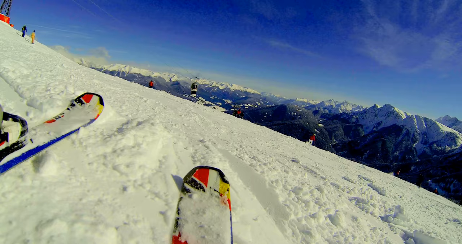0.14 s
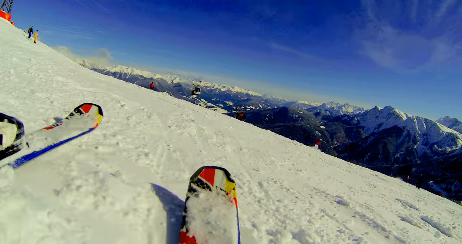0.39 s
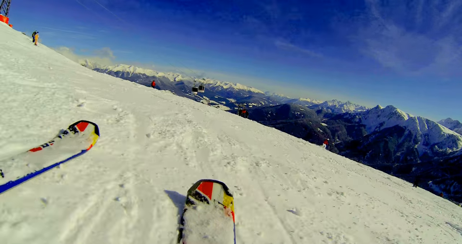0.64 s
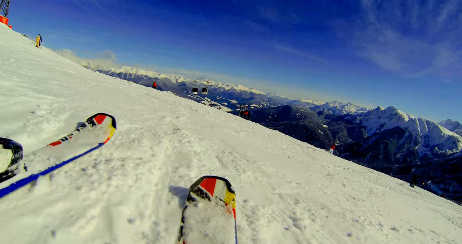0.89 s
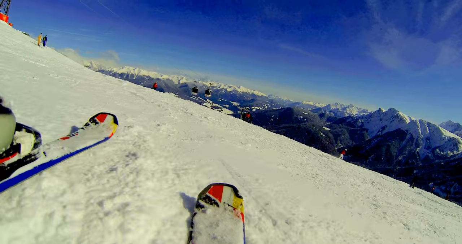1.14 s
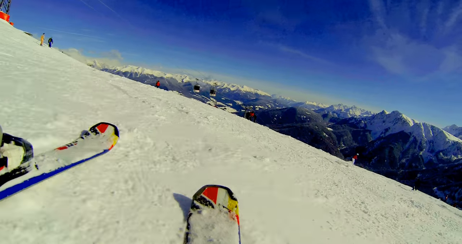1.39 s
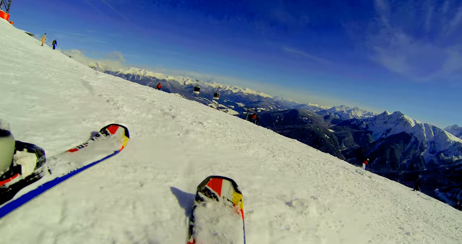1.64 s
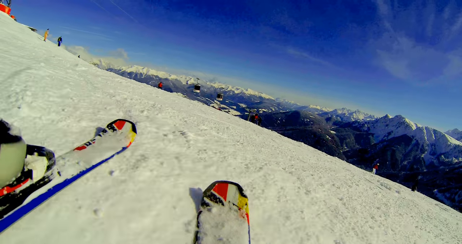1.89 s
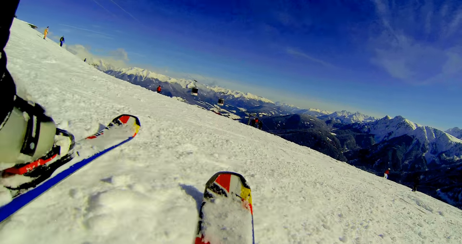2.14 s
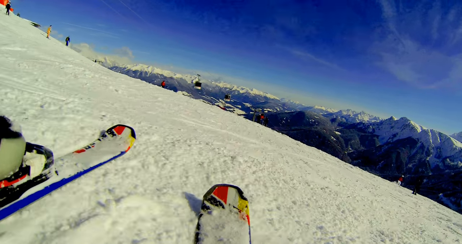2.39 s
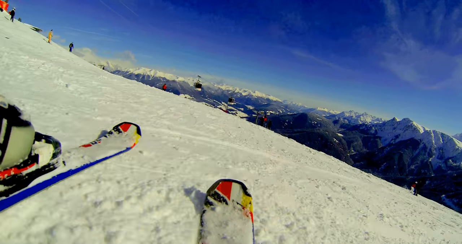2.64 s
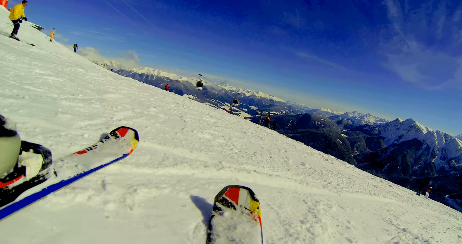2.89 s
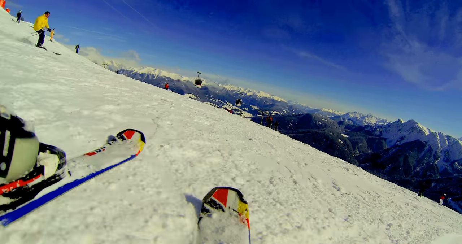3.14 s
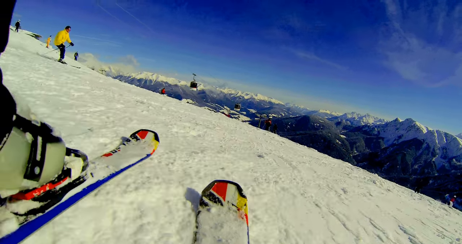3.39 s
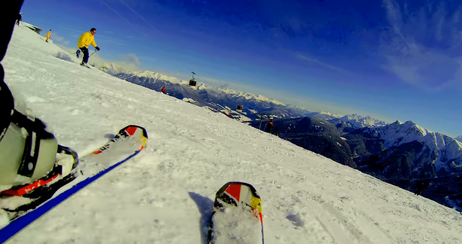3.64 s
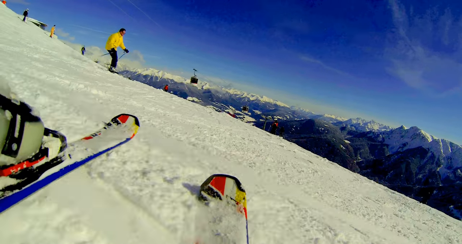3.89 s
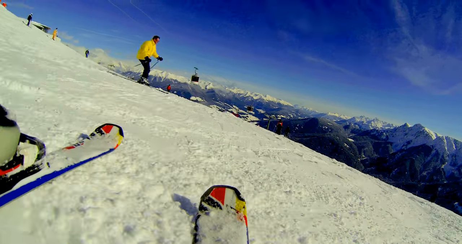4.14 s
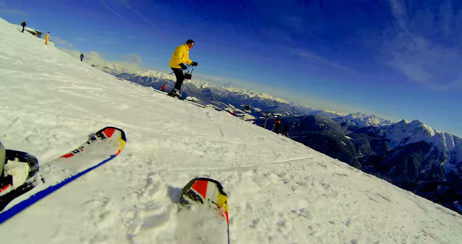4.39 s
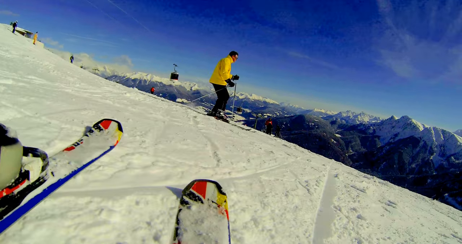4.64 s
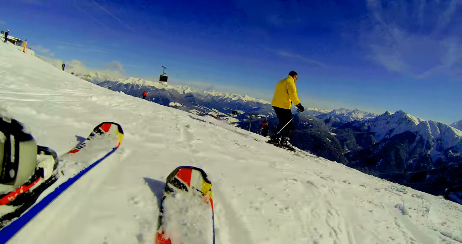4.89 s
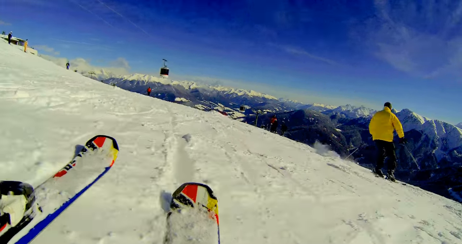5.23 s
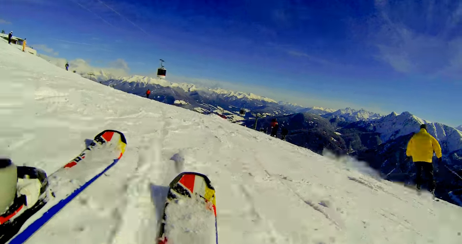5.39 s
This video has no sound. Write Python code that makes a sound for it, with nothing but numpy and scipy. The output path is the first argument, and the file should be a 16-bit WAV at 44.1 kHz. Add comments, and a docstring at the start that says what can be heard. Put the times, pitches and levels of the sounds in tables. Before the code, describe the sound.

Turbulent wind strikes a plastic case carried low beside fast-moving skis: low, lumpy buffeting with gritty edges, thudding slaps and very short lulls. Underneath lies a faint, grainy hiss of skis on hard snow, slightly stronger around 3.6 and after 5 seconds. Bumps shake the case with a deep throb, and its loose joint gives dry plastic knocks: a few from 0.07 to 0.5, a heavy cluster at 0.7-0.8, more at 1.0-1.1, rattling runs at 1.4 and 1.7-1.9, and a tight burst at 2.15. From 2.4 to 4.0 wind leads, with gusts crowding and only scattered knocks, such as 2.95 and 3.4. Brief hollow hoots glide in the wind near 1.2, 3.0, 3.75, 4.3 and 5.2. Knocks return at 4.03-4.3 and 5.0-5.1, then gusts ease into steady wind and sliding. Everything is close, dry and outdoors, with the loudest peaks slightly rounded.

```python
"""Skis over hard snow

The ski bases hiss as crystals shear beneath them.
Turbulent air buffets a plastic case carried low beside the skis, with sharp, gritty gust fronts and slaps
of single eddies; now and then vortices shed in step, a gliding hoot. Bumps swing the case on its springy
mount, whose loose joint knocks at the ends of the swing and frets in tiny ticks."""
import sys
import numpy as np
from scipy import signal
from scipy.fft import rfft, irfft
from scipy.io import wavfile
from scipy.ndimage import uniform_filter1d

SR = 44100
rng = np.random.default_rng(int(sys.argv[2]) if len(sys.argv) > 2 else 0)


def inscribe(sig):
    """Save sig as 16-bit PCM at rate SR to the path in sys.argv[1].

    A 1-D sig is mono; a 2-D sig holds one channel per row.
    Samples are clipped to [-1, 1] before scaling.
    """
    pcm = np.round(np.clip(np.atleast_2d(sig).T, -1, 1) * 32767)
    wavfile.write(sys.argv[1], SR, pcm.astype(np.int16))


N = 244314
TIME = np.arange(N) / SR  # s

# Levels in the tables are relative; each layer adds its own offset.
# gusts on the case: start_s, length_s, large_eddies_db, small_eddies_db
GUST_EVENTS = [(0.275, 0.066, -12.5, -28.5), (0.417, 0.092, -14.5, -25.5), (0.507, 0.038, -14.5, -32),
               (0.678, 0.046, -20, -38), (0.766, 0.038, -16, -28.5), (0.856, 0.04, -17, -26),
               (1.066, 0.06, -16.5, -41), (1.193, 0.14, -14, -27), (1.389, 0.126, -16.5, -36),
               (1.535, 0.049, -18, -26.5), (1.572, 0.044, -17.5, -39), (1.712, 0.032, -15, -31),
               (1.854, 0.061, -16.5, -37), (2.211, 0.063, -16, -38), (2.389, 0.072, -11, -30.5),
               (2.487, 0.048, -13.5, -28), (2.664, 0.034, -14, -29), (2.714, 0.068, -15, -28),
               (2.806, 0.079, -12.5, -29), (2.887, 0.061, -15, -23.5), (2.959, 0.16, -14, -21),
               (3.137, 0.076, -16.5, -36), (3.245, 0.082, -12.5, -31), (3.334, 0.068, -18, -33),
               (3.404, 0.03, -12.5, -31), (3.597, 0.12, -16, -21.5), (3.734, 0.14, -11, -26),
               (3.891, 0.066, -15.5, -36), (4.11, 0.11, -15.5, -28), (4.268, 0.083, -13, -26.5),
               (4.655, 0.042, -10.5, -20), (5.047, 0.116, -13, -25.5), (5.188, 0.048, -15.5, -33),
               (5.25, 0.067, -15.5, -29.5)]
# steady wind noise between gusts, breakpoints: time_s, level_db
STREAM_LEVEL = [(0.0, -18), (0.1, -29), (0.4, -20), (1.0, -27.5), (1.35, -20.5), (1.68, -28), (1.75, -20.5),
                (2.15, -23), (2.3, -25), (2.6, -23.5), (3.0, -25), (3.5, -19.5), (4.05, -21), (4.5, -22),
                (4.85, -27.5), (5.05, -17.5), (5.25, -31.5), (5.54, -21.5)]
# brief dips in the level of the steady wind noise (negative ones are lifts): start_s, length_s, dip_db
STREAM_DIPS = [(0.18, 0.075, -2), (0.555, 0.07, 4.5), (0.921, 0.041, 0), (1.939, 0.12, 12),
               (2.273, 0.013, 1), (3.57, 0.015, 7), (3.881, 0.012, 4), (3.959, 0.015, 20),
               (4.225, 0.038, 2.5), (4.369, 0.099, 8), (4.73, 0.061, 10), (4.88, 0.037, 4.5),
               (5.33, 0.05, -1.5)]
# vortices shed in step: start_s, length_s, first_hz, middle_hz, last_hz, level_db, swell_db (first to last)
VORTEX_HOOTS = [(1.07, 0.078, 246, 261, 272, -24.5, -18), (1.174, 0.15, 227.7, 244.6, 385, -14.5, 5),
                (1.42, 0.089, 203, 208.6, 210, -19.5, 3), (1.885, 0.047, 254, 322, 340, -21.5, 3),
                (2.81, 0.051, 309, 307, 330, -16, 8), (3.012, 0.0904, 211.6, 255, 313, -14, 6),
                (3.098, 0.1, 371.5, 365, 248, -20.5, 7), (3.61, 0.11, 198, 220.6, 275, -18.5, 14),
                (3.746, 0.1, 219, 252, 211, -11, -5.5), (3.905, 0.04, 194, 201, 187, -12.5, 3),
                (4.134, 0.08, 240, 277.6, 322, -16.5, 10.5), (4.29, 0.045, 190, 200, 200, -14, -4),
                (5.193, 0.1152, 348.6, 280.2, 264.3, -17.5, 9.5)]
# strongest single eddies on the case: time_s, peak_db, centre_hz
EDDY_SLAPS = [(0.253, -1, 252), (0.306, 0.5, 263), (0.446, -0.5, 248), (0.527, 2, 280), (0.689, -1, 312),
              (0.793, -4, 423), (1.276, 1.5, 270), (1.396, 0.5, 295), (2.219, -1, 255), (2.681, -2, 217),
              (2.815, 1, 280), (2.849, -1, 303.5), (2.968, -0.5, 283.6), (2.995, -6, 280),
              (3.283, -1.5, 265), (3.362, -3, 243), (3.911, 0, 332), (4.116, -4, 290), (4.661, -5.5, 258.2),
              (5.079, -0.5, 278.5), (5.107, -0.5, 260)]
# sharp gust fronts, abrupt puffs of small eddies: time_s, peak_db
GUST_FRONTS = [(0.253, -21), (0.652, -13.5), (0.686, -12), (1.395, -15.5), (1.708, -10.5), (2.075, -17.5),
               (2.397, -17.5), (2.512, -13), (2.618, -16.5), (3.248, -23), (3.909, -18), (3.983, -17),
               (4.384, -26), (4.481, -26), (4.922, -17.5), (5.446, -15.5)]
# spectrum of the gust fronts: frequency_hz, density_db (per Hz)
FRONT_COLOUR = [(200, -7.5), (450, 5.5), (750, 0.5), (1100, -12), (1330, -10.5), (1700, -15), (3000, -19.5),
                (4500, -37.5), (15000, -53)]
# spectrum of the large eddies: frequency_hz, density_db (per Hz)
BIG_EDDY_COLOUR = [(40, -16), (90, -3), (130, -6), (230, 1.5), (330, -5), (450, -11), (650, -23),
                   (1000, -39), (2000, -70.5), (5000, -100)]
# spectrum of the small eddies: frequency_hz, density_db (per Hz)
SMALL_EDDY_COLOUR = [(150, -9), (350, 8.5), (500, 4.5), (750, -2.5), (900, -13), (1100, -11.5), (1330, -25),
                     (1600, -15), (2000, -25.5), (3000, -40), (5000, -51), (15000, -58.5)]
# rough snow shakes the mount: start_s, length_s, swing_db, light_rattle_db
SNOW_BUMPS = [(0.03, 0.21, -20, -47), (0.234, 0.099, -18, -58), (0.383, 0.032, -17, -28),
              (0.46, 0.031, -15.5, -28.5), (0.68, 0.055, -13, -39), (0.744, 0.07, -16.5, -15.5),
              (0.988, 0.085, -22, -61), (1.351, 0.066, -16.5, -37), (1.554, 0.06, -19, -39),
              (1.705, 0.21, -17, -27.5), (2.128, 0.064, -15, -17.5), (2.208, 0.41, -25.5, -61),
              (2.624, 0.14, -16, -42.5), (2.81, 0.22, -18, -44), (3.29, 0.067, -15, -50),
              (3.385, 0.077, -15, -35.5), (3.57, 0.018, -15, -28), (3.631, 0.19, -22.5, -63),
              (3.86, 0.16, -18.5, -53), (4.023, 0.1, -14.5, -25.5), (4.283, 0.05, -18.5, -19),
              (4.547, 0.16, -21, -44), (4.953, 0.16, -16.5, -39.5), (5.456, 0.16, -16, -54)]
# spectrum of the jolts to the mount: frequency_hz, density_db (per Hz)
MOUNT_COLOUR = [(15, -30), (30, -24), (42, -20), (55, -2.5), (68, -4), (85, -3.5), (110, -13.5), (160, -13),
                (400, -82), (1500, -140)]
# the loose joint hits its stop hard: time_s, level_db, hardness_db (of the crack)
HARD_KNOCKS = [(0.0674, -22.5, -1), (0.0861, -21, -2), (0.1229, -25, -11), (0.1572, -25.5, -7),
               (0.3018, -19, 1.5), (0.3924, -18.5, -0.5), (0.4795, -16.5, 0), (0.536, -28, -6),
               (0.6953, -15.5, -2), (0.7414, -15.5, -3.5), (0.7528, -13.5, -11), (0.7599, -16.5, -5),
               (0.7704, -10.5, -7.5), (0.7889, -10.5, -11), (0.8066, -9, -23), (0.8652, -26, -4.5),
               (0.8895, -28.5, -4), (1.011, -21, -0.5), (1.031, -24, 0), (1.0931, -20, -1),
               (1.3457, -28, -4), (1.3713, -28, -7), (1.398, -17.5, -8), (1.406, -15.5, 1.5),
               (1.4219, -18, -10), (1.4261, -19, -2), (1.4469, -25.5, -2), (1.5642, -17.5, -2),
               (1.5838, -18.5, -1.5), (1.74, -15.5, 0), (1.7618, -19.5, 2.5), (1.791, -16.5, 1),
               (1.8031, -12.5, -9), (1.816, -18, -1), (1.8383, -19, -2), (1.8492, -22.5, -2),
               (1.867, -21, -3), (1.8772, -15, -7), (1.881, -16, -8), (1.9057, -23, -3),
               (2.1366, -19.5, -1.5), (2.1524, -19.5, 0), (2.162, -14.5, -6), (2.166, -18, -15),
               (2.169, -17.5, -5), (2.181, -15.5, -3), (2.184, -16.5, -23), (2.189, -17.5, -4),
               (2.204, -24, 0), (2.2612, -31.5, -14), (2.7283, -30.5, -3), (2.953, -14.5, -0.5),
               (2.9638, -27, -4), (3.3184, -25.5, -7), (3.3886, -15, 0), (3.4235, -15, -1),
               (3.4406, -25, -1), (3.598, -24, -1), (4.033, -14, -0.5), (4.048, -15, -11),
               (4.0521, -16.5, -2), (4.0623, -13.5, -6), (4.0849, -24, -2), (4.1238, -23, -2),
               (4.279, -24, -8), (4.2914, -21.5, -2), (4.3067, -17, -4.5), (4.324, -22.5, -2),
               (4.388, -30, -11), (4.5612, -28, -5), (4.6171, -23.5, -3.5), (4.6658, -21, -8),
               (4.9845, -13, -0.5), (5.0382, -13, -3), (5.063, -17.5, -1), (5.091, -22, -4),
               (5.1164, -24.5, -6.5)]
# spectrum of a blow on the case: frequency_hz, density_db (per Hz)
CASE_COLOUR = [(200, 2), (700, 0), (1150, -8), (1600, -4), (1950, 1.5), (2900, 1.5), (3600, -10.5),
               (4300, -13), (5300, -9.5), (6700, -27), (8500, -19.5), (10000, -26), (12000, -31.5),
               (15000, -33)]
# the bases slide on the snow, breakpoints: time_s, level_db
SLIDE_LEVEL = [(0.0, -47), (0.49, -47), (0.63, -44.5), (0.95, -50), (1.45, -44.5), (1.93, -43.5),
               (2.24, -51), (2.6, -50), (2.82, -45.5), (3.1, -46.5), (3.33, -46.5), (3.55, -40),
               (4.18, -48.5), (4.91, -45.5), (5.11, -41.5), (5.54, -43)]
# spectrum of sheared snow: frequency_hz, density_db (per Hz)
SNOW_COLOUR = [(100, -8.5), (600, 6), (1250, -1.5), (1700, 1), (2400, -2), (3200, -1), (4200, -10),
               (5300, -19), (6700, -22), (8400, -22), (9800, -34.5), (12000, -27.5), (15000, -40.5)]
# faint resonances of the plastic shell: centre_hz, width_hz, lift_db
SHELL_BANDS = [(712, 67, 4.5), (892, 42, 8.5), (1170, 130, 4.5), (1570, 190, 4)]

GUST_RISE_S, GUST_FALL_S, DIP_EDGE_S, FRONT_RISE_S = 0.005, 0.0038, 0.0077, 0.0015
BUMP_RISE_S, BUMP_FALL_S = 0.014, 0.029
CRUISE_SWING_DB = -29  # the swing never quite rests
SPRING_HZ = 57  # nominal swing rate of the mount, about which it wanders
REST_S = 0.005  # a hard blow leaves no room for a light one this close to it
EDGE_HZ = 15400  # upper band limit


def gain_of(db):
    """Logarithmic level: decibels to amplitude."""
    return 10 ** (np.asarray(db) / 20)


def curve(rows, at=TIME):
    """Linear interpolation: each column of a table joined by straight lines in time."""
    s, *columns = np.transpose(rows)
    return [np.interp(at, s, c) for c in columns]


def read(points, hz):
    """Spectral interpolation: a level in dB, linear along a log-frequency axis."""
    f, db = np.transpose(points)
    return np.interp(np.log(hz + 1), np.log(f), db)


def coloured(x, points):
    """Linear filtering: a spectrum imposed on x, then scaling to unit standard deviation."""
    hz = np.fft.rfftfreq(N, 1 / SR)
    y = irfft(rfft(x) * gain_of(read(points, hz)), N)
    return y / y.std()


def strength(x, size):
    """Short-time power: the running rms of a sound over about size samples."""
    power = uniform_filter1d(uniform_filter1d(x ** 2, size), size)
    return np.sqrt(np.abs(power))


def steadied(x, size):
    """Level normalisation: swells slower than size samples are divided out."""
    power = uniform_filter1d(uniform_filter1d(x ** 2, size), size)
    return x / np.sqrt(power + 1e-9)


def flutter(rate_hz):
    """Low-passed noise: smooth random variation of unit spread, up to a rate."""
    hz = np.fft.rfftfreq(N, 1 / SR)
    y = irfft(rfft(rng.standard_normal(N)) / (1 + (hz / rate_hz) ** 4), N)
    return y / y.std()


def add(mix, s, sound):
    """Superposition: a sound is summed into mix, in place, from time s."""
    part = mix[max(round(s * SR), 0):][:len(sound)]
    part += sound[:len(part)]


def swells(spans, rise_s, fall_s):
    """Exponential growth and decay: amplitude of (start, length, dB) events that rise, hold and fall."""
    out = np.zeros(N)
    for s, length, db in spans:
        outside = np.maximum((s - TIME) / rise_s, (TIME - s - length) / fall_s)
        out = np.maximum(out, gain_of(db) * np.exp(-np.clip(outside, 0, 30)))
    return out


def air(stream_db=0, stream_small_db=-6, gust_db=0, gust_small_db=2):
    """Gusting flow: strength of large and small eddies, gusts above a wind noise with brief dips and lifts."""
    stream, gusts = curve(STREAM_LEVEL)[0], np.array(GUST_EVENTS)
    for s, length, dip_db in STREAM_DIPS:
        stream = stream - dip_db * swells([(s, length, 0)], DIP_EDGE_S, DIP_EDGE_S)
    large = gain_of(gust_db) * swells(gusts[:, :3], GUST_RISE_S, GUST_FALL_S)
    small = gain_of(gust_small_db) * swells(gusts[:, [0, 1, 3]], GUST_RISE_S, GUST_FALL_S)
    wind = np.maximum(large, gain_of(stream + stream_db))
    flurry = np.maximum(small, gain_of(stream + stream_small_db))
    return wind, flurry


def spare(wind, ordered, least_power_share=0.21):
    """Division of power: the strength that an ordered flow leaves to the rest of the wind."""
    left = 1 - (strength(ordered, size=1800) / wind) ** 2
    return wind * np.sqrt(np.clip(left, least_power_share, 1))


def buffet(wind, flurry, big_db=-3.0, small_db=-2, lumps_db=3.0, fine_lumps_db=5.0, grit_db=3.0):
    """Turbulence: large and small eddies are coloured noise that comes in shared lumps."""
    lumps = flutter(79)
    big = coloured(rng.standard_normal(N), BIG_EDDY_COLOUR)
    big = steadied(big * gain_of(lumps_db * lumps), size=1300)
    bursts = rng.standard_normal(N) * gain_of(fine_lumps_db * lumps + grit_db * flutter(300))
    small = steadied(coloured(bursts, SMALL_EDDY_COLOUR), size=1300)
    return gain_of(big_db) * wind * big + gain_of(small_db) * flurry * small


def slaps(wind, level_db=-3, cycles=0.9, front=0.3, wake_db=-17, wake_s=0.0075,
          light_db=3, light_spread_db=1.0, light_hz=330, light_octaves=0.18, count=150):
    """Eddy pressure: each core is a steep dip with a rebound and a ragged wake; light ones follow the wind."""
    out, wake = np.zeros(N), np.zeros(N)
    t = np.arange(-400, 1600) / SR
    at = (np.arange(count) + rng.random(count)) * TIME[-1] / count
    size, pitch = rng.standard_normal((count, 2)).T
    peak_db = 20 * np.log10(np.interp(at, TIME, wind)) + light_db + light_spread_db * size
    light = zip(at, peak_db, light_hz * 2 ** (light_octaves * pitch))
    eddies = [*light, *EDDY_SLAPS]
    width = cycles * np.where(t < 0, front, 1)  # the front is shorter than the rebound
    wake_shape = np.exp(-np.abs(t) / np.where(t < 0, wake_s / 10, wake_s))
    for (s, db, hz), skew in zip(eddies, rng.normal(0, 0.38, len(eddies))):
        dip = -np.cos(2 * np.pi * hz * t + skew) * np.exp(-np.abs(t * hz / width) ** 1.5)
        add(out, s + t[0], gain_of(db + level_db) * dip)
        add(wake, s + t[0], gain_of(db + wake_db) * wake_shape)
    return out + wake * coloured(rng.standard_normal(N), SMALL_EDDY_COLOUR)


def hoots(level_db=-1, waver=0.034, shimmer_db=1.85, second_db=-15, third_db=-19,
          ragged=0.75, dull_hz=720, edge_share=0.25):
    """Vortex shedding: eddies peel off in step, giving a gliding tone with ragged overtones."""
    out = np.zeros(N)
    drift, shimmer = 1 + waver * flutter(53), shimmer_db * flutter(50)
    slip = ragged * flutter(140)  # radians
    for s, length, first_hz, middle_hz, last_hz, db, swell_db in VORTEX_HOOTS:
        on = (TIME >= s) & (TIME <= s + length)
        along = (TIME[on] - s) / length - 0.5
        hz = np.interp(along, [-0.5, 0, 0.5], [first_hz, middle_hz, last_hz])
        phase = 2 * np.pi * np.cumsum(hz * drift[on]) / SR
        tone = np.cos(phase)
        for k, overtone_db in enumerate([second_db, third_db], 2):
            overtone = gain_of(overtone_db) * np.cos(k * phase + (k - 1) * slip[on])
            tone = tone - overtone / np.hypot(1, (k * hz / dull_hz) ** 6)
        loudness = gain_of(db + swell_db * along + level_db + shimmer[on])
        out[on] += np.sqrt(2) * tone * loudness * signal.windows.tukey(on.sum(), edge_share)
    return out


def gust_fronts(level_db=-7, grit_db=3, decay_s=0.017):
    """Turbulent onset: a sharp gust front is an abrupt, gritty puff of small eddies that dies away."""
    envelope, t = np.zeros(N), np.arange(SR // 5) / SR
    puff = np.minimum(t / FRONT_RISE_S, 1) * np.exp(-t / decay_s)
    for s, db in GUST_FRONTS:
        add(envelope, s, gain_of(db + level_db) * puff)
    grit = rng.standard_normal(N) * gain_of(grit_db * flutter(270))
    return envelope * coloured(grit, FRONT_COLOUR)


def mount(wander=0.0997):
    """Spring oscillation: reach of the swing, raised by bumps, and the running count of swings."""
    reach = swells(np.array(SNOW_BUMPS)[:, :3], BUMP_RISE_S, BUMP_FALL_S)
    reach = np.maximum(reach, gain_of(CRUISE_SWING_DB))
    turns = np.cumsum(SPRING_HZ * (1 + wander * flutter(22.6))) / SR
    return reach, turns


def sway(reach, turns, level_db=-1.5, jolts_db=3, surge_db=3.0):
    """Driven oscillator: the case swings on its springy mount, jolted at random by the snow."""
    swing = np.sqrt(2) * np.sin(2 * np.pi * turns)
    jolts = gain_of(jolts_db) * coloured(rng.standard_normal(N), MOUNT_COLOUR)
    surge = gain_of(level_db + surge_db * flutter(23))
    return reach * surge * steadied(swing + jolts, size=1300)


def knock(hardness_db, weight, vary_db=0.4, tail_db=-27, tail_t60_s=0.019, bounce_s=0.001261, bounce=0.97,
          wall_hz=1880, wall_width_hz=500, wall_db=4, size=2048):
    """Impact response: one blow rings the damped case, with a rebound and a short buzz."""
    hz = np.fft.rfftfreq(size, 1 / SR)
    # the ring differs a little from blow to blow, as with the point of contact
    ripple = np.interp(hz, np.linspace(0, SR / 2, 50), rng.standard_normal(50))
    wall = weight * wall_db / (1 + (2 * (hz - wall_hz) / wall_width_hz) ** 2)  # heavy blows flex the wall
    crack = hardness_db * np.interp(hz, [3000, 4800], [0, 1])
    db = read(CASE_COLOUR, hz) + wall + vary_db * ripple + crack
    # minimum phase: sharp front, ringing after
    log_gain = np.log(gain_of(np.r_[db, db[-2:0:-1]]))
    ring = np.fft.ifft(np.exp(signal.hilbert(log_gain).conj())).real
    buzz_db = tail_db - 60 * np.arange(size) / SR / tail_t60_s
    contact = rng.standard_normal(size) * gain_of(buzz_db)
    contact[0] = 1
    contact[int(bounce_s * SR * rng.uniform(0.5, 1.5))] += bounce * weight
    y = signal.fftconvolve(ring, contact)[:size]
    return y / np.sqrt(np.mean(y[:110] ** 2))  # unit rms over the first 2.5 ms


def rattle(turns, level_db=1, hard_db=2, light_db=-1, light_spread_db=6.5,
           light_hard_db=-6, light_hard_spread_db=3.0, scatter_s=0.0015):
    """Collision at stops: the loose joint gives listed hard blows, and light ones twice a swing in bumps."""
    blows, hard_s = list(HARD_KNOCKS), np.array(HARD_KNOCKS)[:, 0]
    stops = TIME[1:][np.diff(np.floor(2 * turns)) > 0]
    for s, (late, force, edge) in zip(stops, rng.standard_normal((len(stops), 3))):
        for start, length, _, db in SNOW_BUMPS:
            if start <= s < start + length and np.abs(hard_s - s).min() > REST_S:
                light_level_db = db + light_db + light_spread_db * force
                light_hardness_db = light_hard_db + light_hard_spread_db * edge
                blows.append((s + scatter_s * late, light_level_db, light_hardness_db))
    out = np.zeros(N)
    for s, db, hardness_db in blows:
        weight = np.interp(db, [-22, -11], [0.2, 1])
        blow = knock(hardness_db + hard_db, weight)
        add(out, s, rng.choice([-1, 1]) * gain_of(db + level_db) * blow)
    return out


def chatter(knocks, reach, per_s=700, spread_db=6.5, rattle_share_db=-16, swing_share_db=-30):
    """Random micro-impacts: the joint frets in tiny ticks with the swing."""
    size_db = spread_db * np.minimum(rng.exponential(1, N), 3)
    ticks = (rng.random(N) < per_s / SR) * gain_of(size_db) * rng.choice([-1, 1], N)
    rattle_level = strength(knocks, size=700)
    level = gain_of(rattle_share_db) * rattle_level + gain_of(swing_share_db) * reach
    return coloured(ticks, CASE_COLOUR) * level


def slide(level_db=3, rough_db=2.0, grains_per_s=260, grain_db=9, grain_spread_db=4):
    """Sliding friction: countless crystals shear under the bases, and larger crumbs of ice tick."""
    size_db = grain_db + grain_spread_db * np.minimum(rng.exponential(1, N), 4)
    crumbs = (rng.random(N) < grains_per_s / SR) * gain_of(size_db) * rng.choice([-1, 1], N)
    shear = rng.standard_normal(N) * gain_of(rough_db * flutter(84))
    return gain_of(curve(SLIDE_LEVEL)[0] + level_db) * coloured(shear + crumbs, SNOW_COLOUR)


def shell(x):
    """Resonance: the plastic shell lifts a few narrow bands of the wind and the hiss."""
    hz = np.fft.rfftfreq(N, 1 / SR)
    lift_db = sum(db / (1 + (2 * (hz - f) / width) ** 2) for f, width, db in SHELL_BANDS)
    return irfft(rfft(x) * gain_of(lift_db), N)


def scene(hoot_fray_db=-8.5):
    """Superposition: wind, shaking mount and snow, close by in the open; a hoot frays into small eddies."""
    wind, flurry = air()
    reach, turns = mount()
    hoot = hoots()
    ordered = hoot + slaps(spare(wind, hoot))
    flurry = np.hypot(flurry, gain_of(hoot_fray_db) * strength(hoot, size=400))
    turbulence = buffet(spare(wind, ordered), flurry)
    rush = shell(turbulence + slide() + gust_fronts())
    knocks = rattle(turns)
    mix = ordered + rush + sway(reach, turns) + knocks + chatter(knocks, reach)
    return mix[None]


def record(dry):
    """Saturation and band limiting: the highest peaks are rounded off, then the top treble is cut."""
    rounded = dry / (1 + np.abs(dry / 0.84) ** 8) ** (1 / 8)
    lowpass = signal.firwin(511, EDGE_HZ, window=("kaiser", 9), fs=SR)
    return signal.oaconvolve(rounded, lowpass[None], "same")


dry = scene()
out = record(dry)
inscribe(out)
```